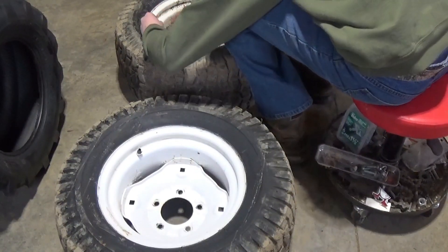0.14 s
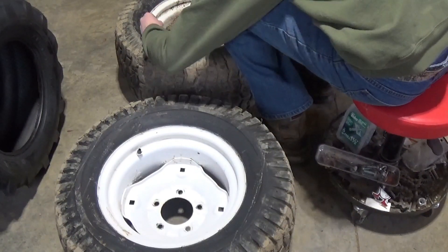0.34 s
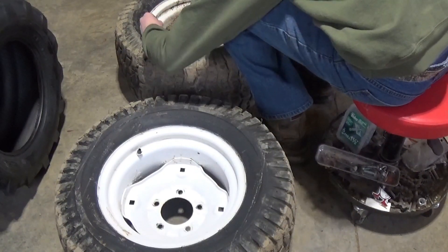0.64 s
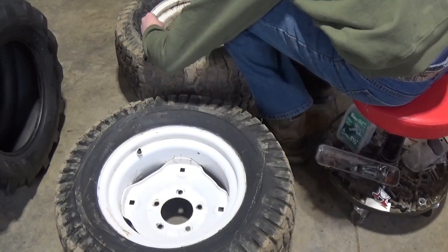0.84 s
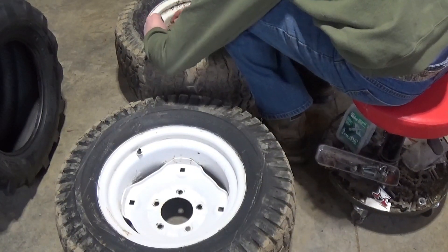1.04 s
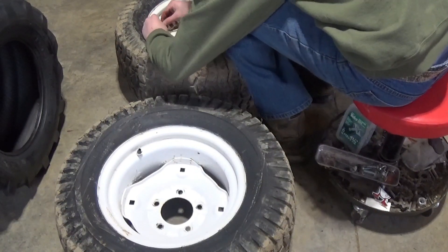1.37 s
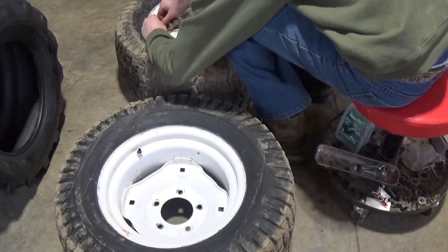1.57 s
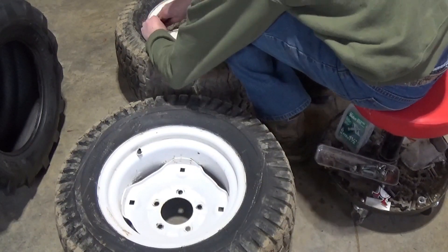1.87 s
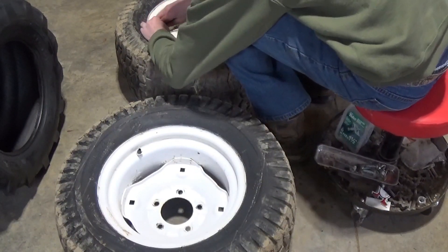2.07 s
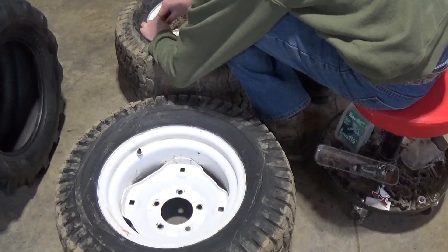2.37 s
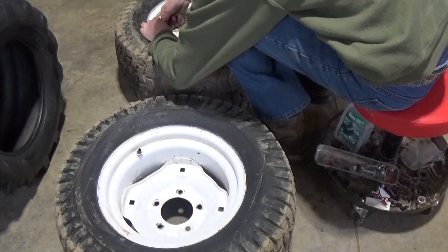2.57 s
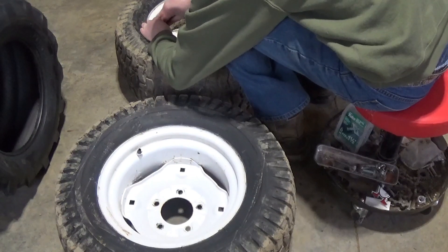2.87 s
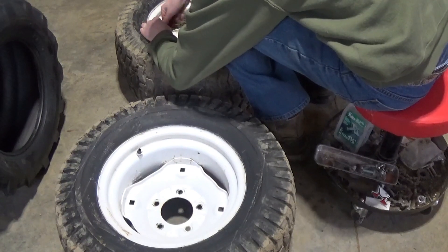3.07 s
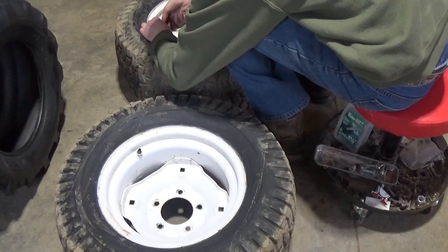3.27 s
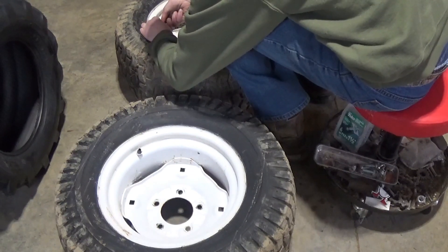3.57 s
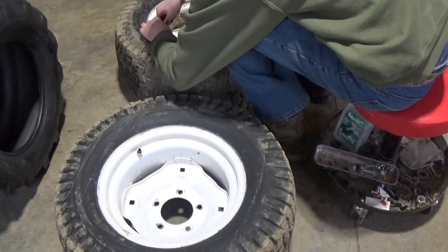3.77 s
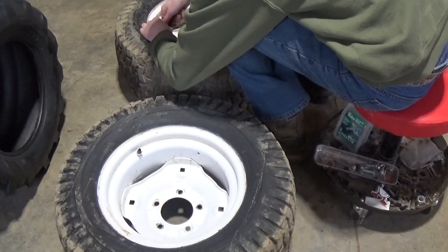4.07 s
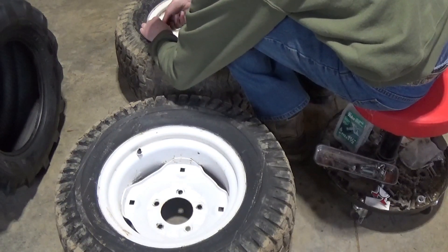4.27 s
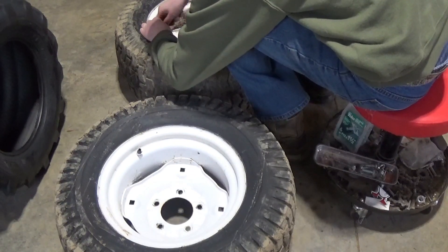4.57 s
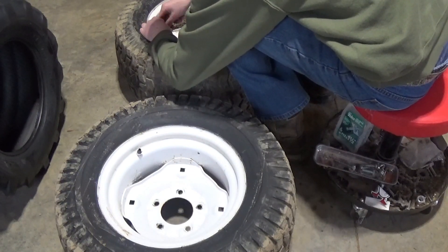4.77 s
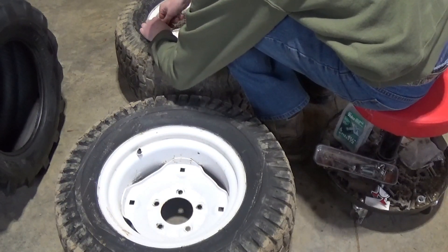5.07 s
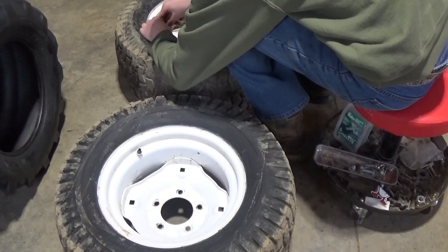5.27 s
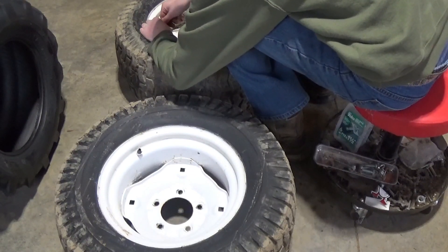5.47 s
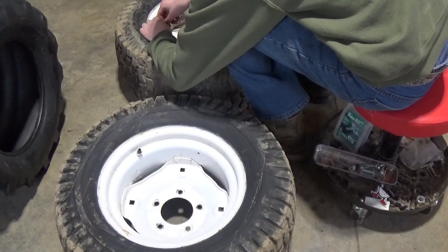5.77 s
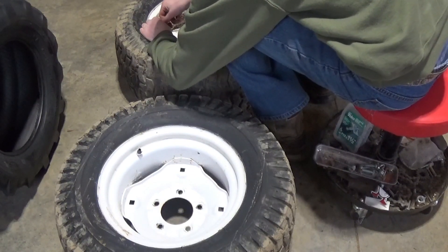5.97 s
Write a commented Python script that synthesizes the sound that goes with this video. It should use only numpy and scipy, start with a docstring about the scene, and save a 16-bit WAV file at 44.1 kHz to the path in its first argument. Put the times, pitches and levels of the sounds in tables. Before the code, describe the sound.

A tire deflates in a garage with a high, fading hiss, thin whistling tones and uneven little spurts as fingers cover the valve.

```python
"""Air runs out of a tractor tire through its valve stem, in a garage.
From the start a turbulent jet excites the stem's air resonances, fading as the pressure falls;
now and then cloth rubs the tire and a knock rings the wheel. From 1.2 s thin edge tones glide
down as the jet slows. At 3.7 s fingers cover the valve: the jet dies away, and air escapes
past them in softer, uneven spurts of hiss, with a few last edge tones and knocks."""
import sys
import numpy as np
from scipy import signal
from scipy.fft import rfft, irfft
from scipy.io import wavfile

SR = 44100
rng = np.random.default_rng(int(sys.argv[2]) if len(sys.argv) > 2 else 0)


def bounce(signal):
    """Save signal as a 16-bit WAV file at the path given by the first command-line argument."""
    frames = np.transpose(np.atleast_2d(signal))
    limited = np.clip(frames, -1, 1)
    pcm = np.round(limited * 32767).astype(np.int16)
    wavfile.write(sys.argv[1], SR, pcm)


N = 270774
TIME, FREQS = np.arange(N) / SR, np.fft.rfftfreq(N, 1 / SR)
COVERED_S = 3.69  # the fingers close over the valve

# Levels are relative within each table; spectra give the level per unit bandwidth.
# spectrum of the room noise: f/Hz, level/dB
ROOM_SPECTRUM = [(20, -44), (35, -30), (55, -23), (120, -13), (230, -5), (450, -0.5), (750, 1), (1400, 1.5),
                 (2300, 0), (4000, -1), (5600, -5.5), (8000, -4), (11000, -12.5)]
# left-right coherence of the room noise: f/Hz, coherence
ROOM_COHERENCE = [(30, .95), (80, 1), (200, 0.37), (1500, 0.12), (3000, 0.5), (11000, 0.69)]
# reverberation time of the garage: f/Hz, T60/s
REVERB_TIME = [(200, 0.45), (1000, 0.79), (4000, 0.26), (11000, 0.27)]
# reflections from the floor and near objects: delay/s, relative gain
REFLECTIONS = [(.0041, 0.36), (.0095, 0.43), (0.0243, 0.16), (.034, 0.19)]
# friction spectrum of cloth on rubber: f/Hz, level/dB
CLOTH_SPECTRUM = [(20, -47), (70, -14.5), (140, -11), (240, -2.5), (500, -0.5), (1000, 2), (1800, 1.5),
                  (3000, -17)]
# strokes of sleeve and hands on the tire: t/s, duration/s, level/dB
CLOTH_STROKES = [(-.08, 0.3, -65.5), (0.498, 0.33, -65), (0.952, 0.24, -66.5), (1.45, 0.14, -65.5),
                 (1.722, 0.061, -63.5), (2.0, 0.13, -67), (2.545, 0.66, -72.5)]
# modes of the steel wheel, damped by its tire: f/Hz, width/Hz, level/dB
WHEEL_MODES = [(200, 110, -3.5), (458, 43, 7), (557, 74, 4.5), (686, 50, -1), (940, 290, -2.5),
               (1060, 86, -4), (1316, 144, 0.5), (1630, 230, 0), (1870, 190, -11), (2770, 730, -2.5),
               (3980, 300, 8), (4830, 500, -7), (9500, 1900, 6)]
# knocks on rim and tire: t/s, level/dB, centre f/Hz, spread/octaves
IMPACTS = [(.001, -49.5, 510, 0.57), (.054, -38, 1160, .77), (.062, -44, 875, 0.12),
           (.857, -53, 1260, 0.65), (1.046, -47.5, 1360, 0.65), (1.054, -48.5, 1070, .1),
           (1.12, -57, 1120, 1.1), (1.522, -54.5, 472, 0.16), (1.705, -55.5, 920, 0.77),
           (1.751, -54.5, 604, 0.23), (1.782, -52, 810, 0.85), (2.009, -49, 2930, 0.33),
           (2.741, -62, 1220, 0.68), (3.201, -56.5, 650, .36), (3.205, -60.5, 1610, .53),
           (3.284, -62, 1310, 1), (3.6722, -44, 1770, 1.3), (3.683, -50.5, 1450, 1.14),
           (5.3492, -52.5, 1790, 0.69), (5.3772, -62, 1400, 0.27), (5.671, -61, 1610, .75),
           (5.98, -65, 1480, .6)]
# fizz of the narrow gap under the fingers: f/Hz, level/dB
FIZZ_SPECTRUM = [(3000, -36), (5500, -19), (6350, -15.5), (6580, -12.5), (6850, -14), (7500, -10.5),
                 (8300, -2), (8550, -7), (8950, -3), (9300, -4.5), (9700, -1.5), (10400, -7.5),
                 (11000, -12)]
# resonances of the covered stem: f/Hz, width/Hz, level/dB
COVERED_MODES = [(2780, 97, -10.5), (3160, 250, -9), (3670, 95, -4), (3840, 110, -2.5), (4050, 260, -0.5),
                 (4320, 170, -4.5), (4795, 64, -7), (4040, 1600, -15)]
# resonances of the wider gap: f/Hz, width/Hz, level/dB
WIDE_GAP_MODES = [(3400, 650, -3), (4670, 120, 6), (5140, 230, 0), (5350, 80, -0.5), (6000, 100, 0.5),
                  (6500, 100, -2)]
# spurts as the fingers ease: t/s, duration/s, fizz level/dB, stem level/dB, wide-gap level/dB
LEAK_SPURTS = [(3.684, 0.21, -88, -65, -88), (4.01, 0.21, -59.5, -60.5, -65), (4.21, 0.15, -61, -60, -64),
               (4.374, 0.14, -65, -66, -67), (4.616, 0.094, -58.5, -62, -79),
               (4.745, 0.14, -65.5, -65, -75), (4.95, .08, -63.5, -76, -90), (5.09, 0.24, -69, -67, -90),
               (5.273, 0.072, -57.5, -61, -78), (5.378, 0.059, -61.5, -63, -90),
               (5.463, 0.038, -59.5, -64, -90), (5.625, 0.087, -58, -61.5, -83),
               (5.73, 0.14, -60.5, -62, -85), (5.894, 0.12, -59, -72, -92), (6.038, .04, -61.5, -69, -90)]
# edge tones locking to the stem: start t/s, lock t/s, end t/s, f/Hz at lock, slide/(Hz/s),
# bend/(Hz/s^2), level/dB, lock width/s, noise share at lock
EDGE_TONES = [(1.2, 1.39, 1.5, 8320, -400, 1, -44.5, 0.064, 0.54),
              (1.25, 1.38, 2.3, 4080, -61, 1, -55, 0.072, 0.2),
              (1.42, 1.55, 2.1, 8270, -200, -5, -44, 0.098, 0.4),
              (2.475, 2.805, 3.25, 8335, -960, 500, -36.5, .057, .004),
              (3.0, 3.2, 3.3, 4200, -60, 0, -66.5, 0.2, 0.87),
              (3.2, 3.36, 3.4, 9160, -1200, -1, -67, .09, .55),
              (3.57, 4.1, 4.64, 8310, -950, -430, -50, .125, .05),
              (3.78, 3.86, 4.1, 4100, -100, 3, -69.5, .09, 0.3),
              (5.4, 5.495, 5.53, 4078, -300, 0, -60.5, .03, .05),
              (5.55, 5.58, 5.59, 4062, -150, 0, -59, .03, .05),
              (5.63, 5.73, 5.88, 4048, -170, 0, -60, .11, .04),
              (5.91, 5.95, 6.06, 3990, -170, -2, -65.5, 0.055, .12),
              (5.7, 5.87, 5.9, 3715, -60, 0.5, -64, 0.057, .15)]
# turbulence spectrum of the jet: f/Hz, level/dB
JET_SPECTRUM = [(20, -60), (60, -48), (250, -37), (500, -23.5), (1000, -20), (1900, -16.5), (2400, -18),
                (3400, -12), (4600, -11), (5300, -18.5), (6500, -13.5), (9350, -17.5), (10300, -6.5),
                (11000, -13.5)]
# air resonances of the open stem: f/Hz, width/Hz, level/dB
STEM_MODES = [(2800, 52, -24), (3410, 95, -12.5), (3827, 170, -0.5), (4085, 57, 1.5), (4200, 260, -6.5),
              (5010, 73, -14.5), (7660, 380, -2.5), (7970, 270, 1), (8260, 254, 1.5), (9050, 150, -8.5),
              (9640, 160, -10.5)]
# flow through the open valve, falling with the tire's pressure: t/s, level/dB
VALVE_FLOW = [(0, -41), (.85, -46.5), (1.1, -47.5), (1.85, -53), (2.35, -59), (2.9, -61), (3.65, -67.5)]


def amp(db):
    """Amplitude ratio of a level in decibels."""
    return 10 ** (np.asarray(db) / 20)


def unit(x):
    """Normalisation to rms 1."""
    return x / np.sqrt(np.mean(abs(x) ** 2) + 1e-20)


def over_hz(points, hz=FREQS):
    """Interpolation of a table on a log-frequency axis."""
    f, value = np.transpose(points)
    return np.interp(np.log(hz + 1), np.log(f + 1), value)


def fade_in(start_s, length_s):
    """Linear ramp from 0 to 1."""
    return np.clip((TIME - start_s) / length_s, 0, 1)


def swells(starts, lengths, levels_db, attack_s, release_s):
    """Incoherent addition: events that rise, hold and decay sum in power to one envelope."""
    power = 0
    for start, length, db in zip(starts, lengths, levels_db):
        release = np.exp(-np.maximum(TIME - start - length, 0) / release_s)
        power += (amp(db) * fade_in(start, attack_s) * release) ** 2
    return np.sqrt(power)


def resonances(modes):
    """Magnitude response of steep-sided resonances, summed in power."""
    powers = (amp(db) ** 2 / (1 + 2 * ((FREQS - hz) / width) ** 2) ** 2 for hz, width, db in modes)
    return np.sqrt(sum(powers))


def noise(gain):
    """Linear filtering of white noise by a gain at each frequency."""
    return irfft(rfft(rng.standard_normal(N)) * gain, N)


def wander(hz, size=16384):
    """Random fluctuation of rms 1, low-passed at hz."""
    f = np.fft.rfftfreq(size, N / SR / size)
    slow = irfft(rfft(rng.standard_normal(size)) / (1 + (f / hz) ** 4))
    return np.interp(TIME, np.linspace(0, N / SR, size), unit(slow))


def pan(db):
    """Level panning: the left channel is db louder than the right."""
    return amp([[db / 2], [-db / 2]])


def garage(x, wet_db, near_db, coherence, build_s=0.0035):
    """Reverberation: direct sound, early reflections and a diffuse tail that dies soonest in the treble."""
    hz, t, spectra = signal.stft(rng.standard_normal((2, SR)), SR, nperseg=256)
    decay = amp(-60 * t / over_hz(REVERB_TIME, hz)[:, None])
    tails = signal.istft(spectra * decay * np.minimum(t / build_s, 1), SR, nperseg=256)[1]
    mid, side = tails / np.linalg.norm(tails, axis=1, keepdims=True)
    response = amp(wet_db) * (np.sqrt(coherence) * mid + np.sqrt(1 - coherence) * np.array([side, -side]))
    for delay, gain in REFLECTIONS:
        response[:, round(delay * SR)] += amp(near_db) * gain
    response[:, 0] += 1  # direct path
    return signal.fftconvolve(x[None], response, axes=1)[:, :N] / np.linalg.norm(response[0])


def room_noise(level_db=-63):
    """Diffuse field: steady noise, nearly coherent between left and right at long wavelengths."""
    colour, coherence = amp(over_hz(ROOM_SPECTRUM)), over_hz(ROOM_COHERENCE)
    mid = noise(colour * np.sqrt(1 + coherence))
    side = noise(colour * np.sqrt(1 - coherence))
    return amp(level_db) * unit(np.array([mid + side, mid - side]))


def cloth_rubbing(grain_db=1.5):
    """Sliding friction: cloth drags unevenly over rubber, stroke by stroke."""
    envelope = swells(*np.transpose(CLOTH_STROKES), attack_s=0.043, release_s=0.28)
    friction = unit(noise(amp(over_hz(CLOTH_SPECTRUM))))
    return friction * envelope * amp(grain_db * wander(9.6))


def wheel_knocks(gain_db=2.5, thud_db=-14, thud_hz=150, settle_db=-14, settle_s=0.021, size=8192):
    """Impact excitation: soft contacts ring the wheel's low modes, hard ones its high modes."""
    t, hz = np.arange(size) / SR, np.fft.rfftfreq(size, 1 / SR)
    thud = amp(thud_db) * hz ** 2 / (hz ** 2 + thud_hz ** 2)
    wheel = np.interp(hz, FREQS, resonances(WHEEL_MODES)) + thud
    out = np.zeros(N + size)
    for start_s, db, centre_hz, spread in IMPACTS:
        contact_s = 0.005 * (1090 / centre_hz) ** 0.39  # brighter contacts are briefer
        settling = amp(settle_db) * np.exp(-t / settle_s)  # the hand scrapes faintly as it settles
        force = rng.standard_normal(size) * np.hypot(np.exp(-t / contact_s), settling)
        gain = wheel / (1 + (np.log2((hz + 1) / centre_hz) / spread) ** 4 / 2)
        log_gain = np.log(np.maximum(gain, 1e-4))
        # minimum phase: the wheel rings only after it is touched
        log_response = np.conj(signal.hilbert(np.r_[log_gain, log_gain[-2:0:-1]]))
        blow = irfft(rfft(force) * np.exp(log_response[:len(hz)]))
        blow /= np.sqrt(np.sum(blow ** 2) / (contact_s * SR))
        start = round(start_s * SR)
        out[start:start + size] += amp(db + gain_db) * blow
    return out[:N]


def finger_leak(fizz_gain_db=4.0, stem_gain_db=0.5, flutter_db=0.48, attack_s=0.028, release_s=0.067):
    """Throttled flow: air seeps and spurts past the fingers, a fizz over the stem's hollow resonance."""
    starts, lengths, *levels = np.transpose(LEAK_SPURTS)
    fizz_spurts, stem_spurts, gap_spurts = (
        swells(starts, lengths, db, attack_s, release_s) for db in levels)
    seep = fade_in(COVERED_S, attack_s)
    fizz = unit(noise(amp(over_hz(FIZZ_SPECTRUM)))) * np.hypot(fizz_spurts, seep * amp(-65.5))
    stem = unit(noise(resonances(COVERED_MODES))) * np.hypot(stem_spurts, seep * amp(-66))
    wide_gap = unit(noise(resonances(WIDE_GAP_MODES))) * gap_spurts
    hiss = amp(fizz_gain_db) * fizz + amp(stem_gain_db) * stem + wide_gap
    return hiss * amp(flutter_db * wander(36))


def edge_tone(row, narrow_hz=55, wide_hz=150, waver_hz=7, pure_before_s=0.34, pure_after_s=0.17):
    """Lock-in: a falling edge tone is loudest and purest at a stem resonance, breathier to each side."""
    start_s, lock_s, end_s, lock_hz, slide, bend, peak_db, lock_width_s, noise_at_lock = row
    t = np.clip(TIME, start_s, end_s) - lock_s
    hz = lock_hz + slide * t + bend * t ** 2
    envelope = amp(peak_db) / (1 + (t / lock_width_s) ** 2) ** 0.71
    hold = np.exp(-(t / np.where(t < 0, pure_before_s, pure_after_s)) ** 2)
    breathy = 1 - (1 - noise_at_lock) * hold
    carrier = np.exp(2j * np.pi * np.cumsum(hz + waver_hz * wander(44)) / SR)
    # random modulation broadens the spectral line into a band of noise
    narrow, wide = (unit(wander(width) + 1j * wander(width)) for width in (narrow_hz, wide_hz))
    modulation = np.sqrt(1 - breathy) * (1 + np.sqrt(breathy) * narrow) + breathy * wide
    gate = fade_in(start_s, 0.028) * (1 - fade_in(end_s, 0.029))
    return np.sqrt(2) * (carrier * modulation).real * envelope * gate


def valve_jet(gain_db=5.5, rush_exponent=1.177, flutter_db=0.37, choke_db_per_s=22):
    """Forced resonance: turbulence rings the stem; its broad rush fades a little faster than the ring."""
    choke_db = choke_db_per_s * np.maximum(TIME - COVERED_S, 0)
    flow_db = np.interp(TIME, *np.transpose(VALVE_FLOW)) - choke_db
    ring = noise(resonances(STEM_MODES))
    rush = noise(amp(over_hz(JET_SPECTRUM))) * amp((rush_exponent - 1) * (flow_db - flow_db.max()))
    return (ring + rush) / ring.std() * amp(gain_db + flow_db + flutter_db * wander(30))


def scene():
    """Superposition: valve and wheel sound in the garage, over its steady noise."""
    jet = garage(valve_jet(), wet_db=-9, near_db=-25, coherence=0.56) * pan(1.2)
    leak = garage(finger_leak(), wet_db=-4.5, near_db=-4.5, coherence=0.7) * pan(0.36)
    tones = sum(edge_tone(row) for row in EDGE_TONES)
    tones = garage(tones, wet_db=-18.5, near_db=-24, coherence=0.33) * pan(1.8)
    handling = wheel_knocks() + cloth_rubbing()
    handling = garage(handling, wet_db=-4.5, near_db=-4, coherence=0.66) * pan(-0.5)
    return room_noise() + handling + leak + tones + jet


def record(dry, cutoff_hz=11080):
    """Band limiting: a steep low-pass filter removes the highest treble."""
    lowpass = signal.firwin(801, cutoff_hz, window=("kaiser", 8), fs=SR)
    return signal.oaconvolve(dry, lowpass[None], "same")


dry = scene()
out = record(dry)
bounce(out)
```